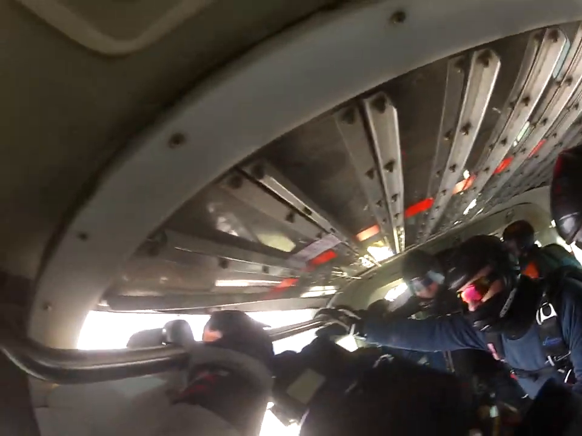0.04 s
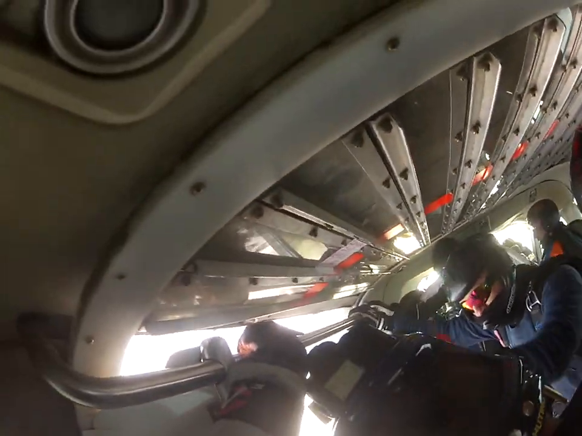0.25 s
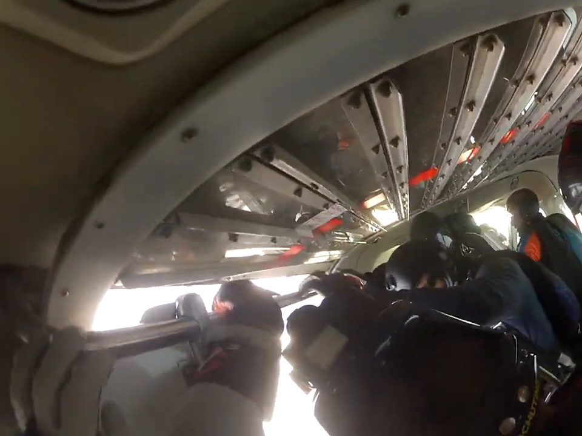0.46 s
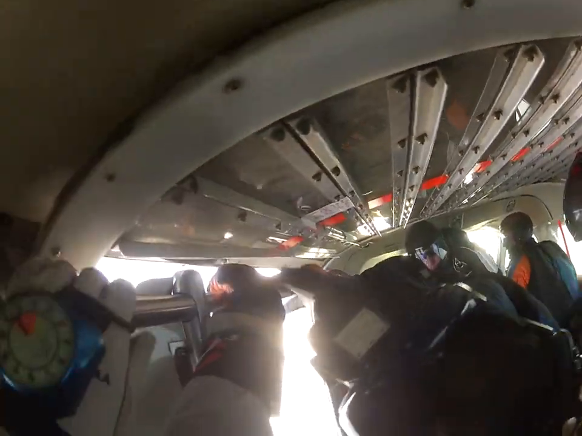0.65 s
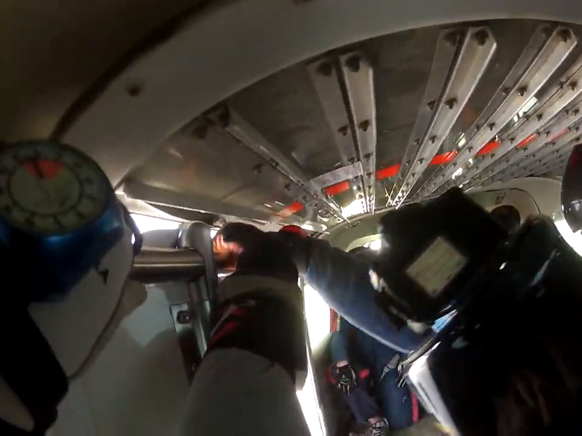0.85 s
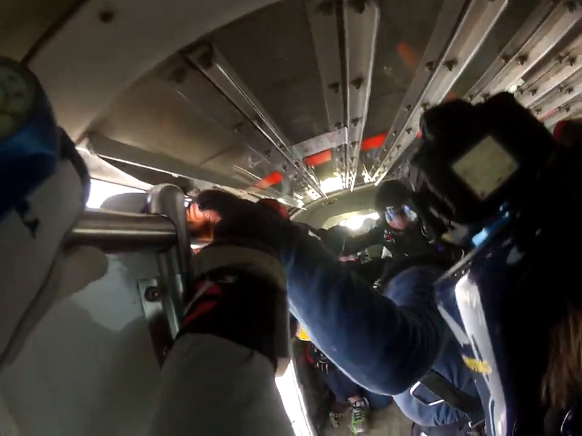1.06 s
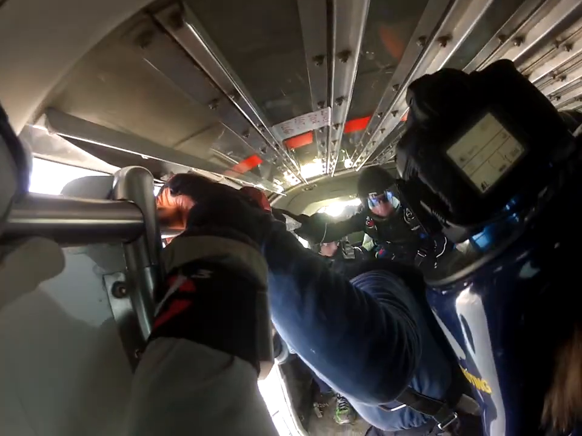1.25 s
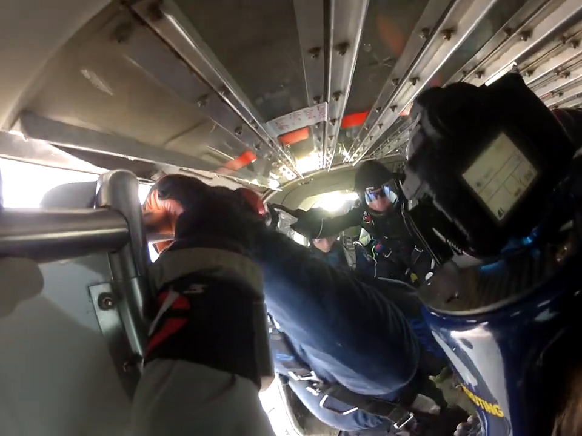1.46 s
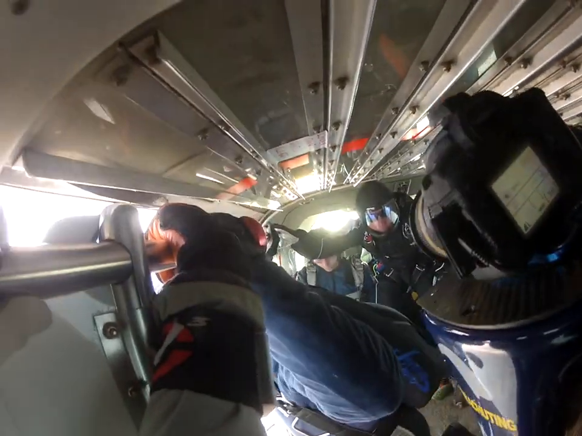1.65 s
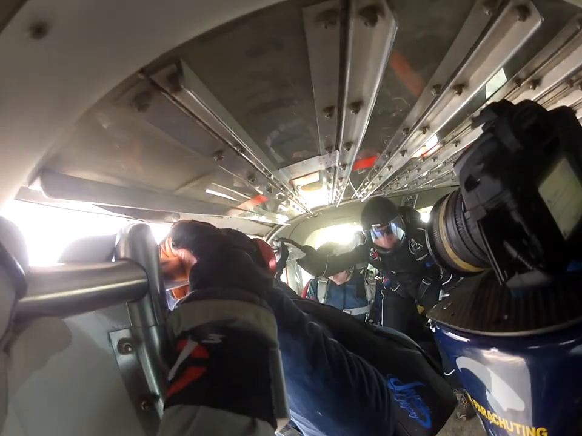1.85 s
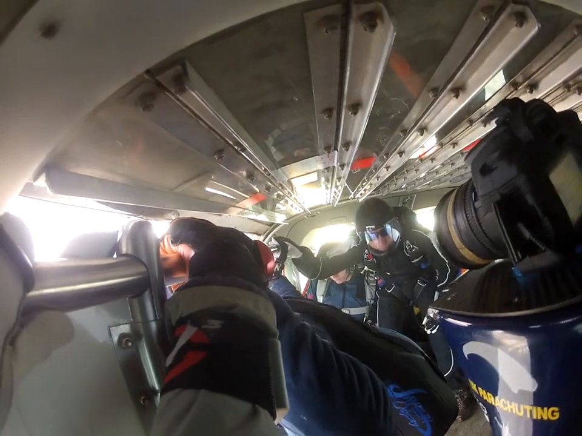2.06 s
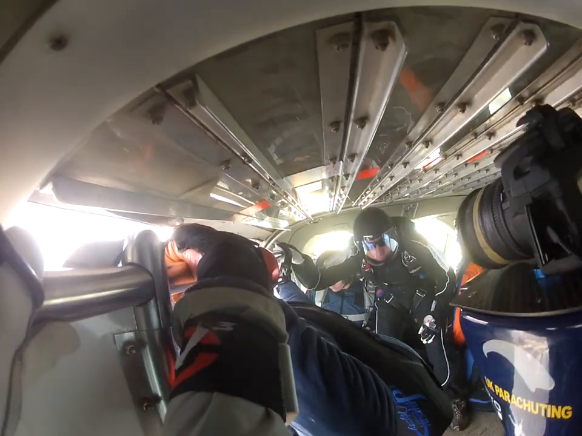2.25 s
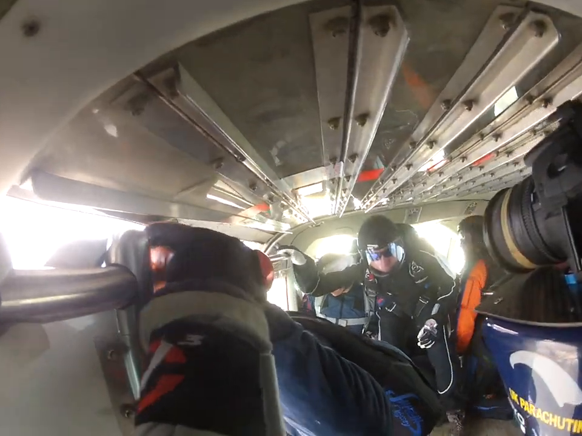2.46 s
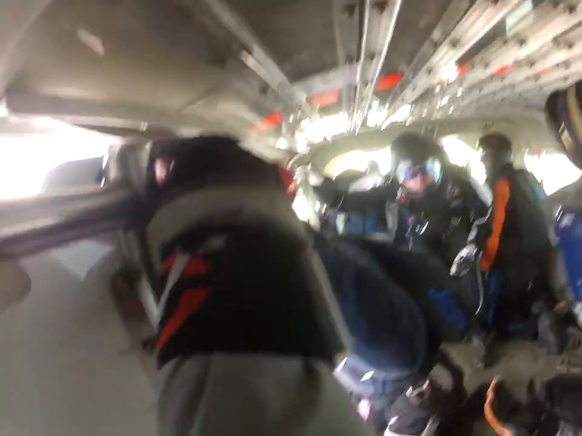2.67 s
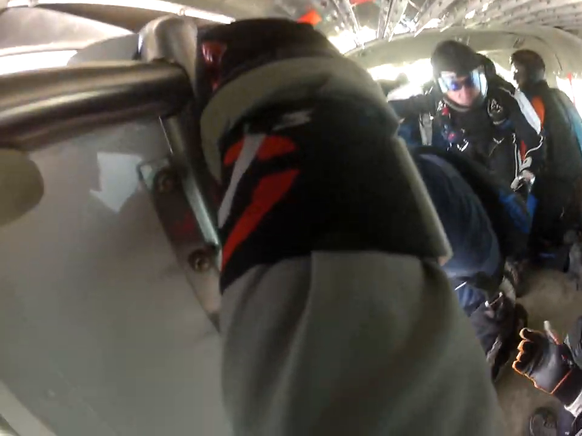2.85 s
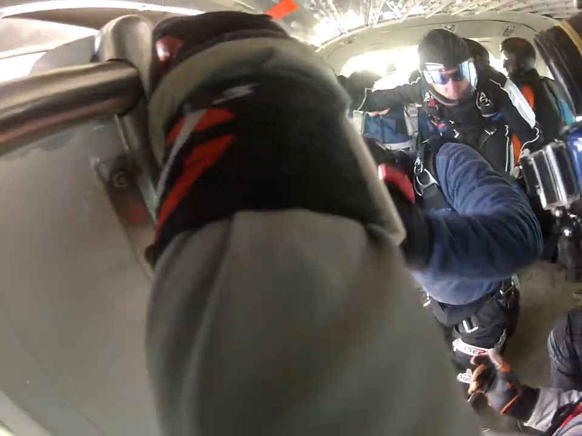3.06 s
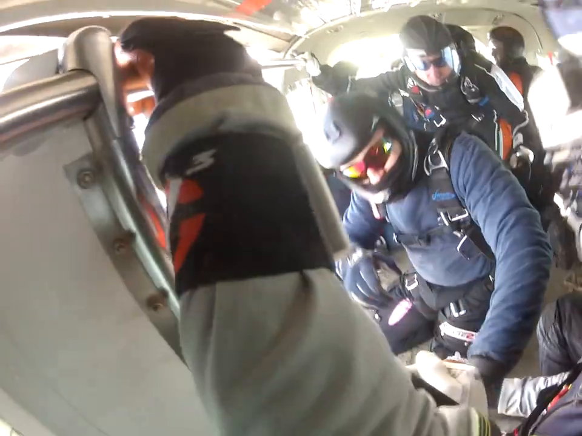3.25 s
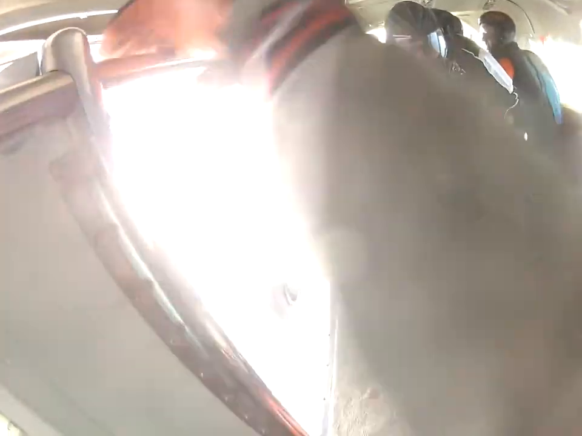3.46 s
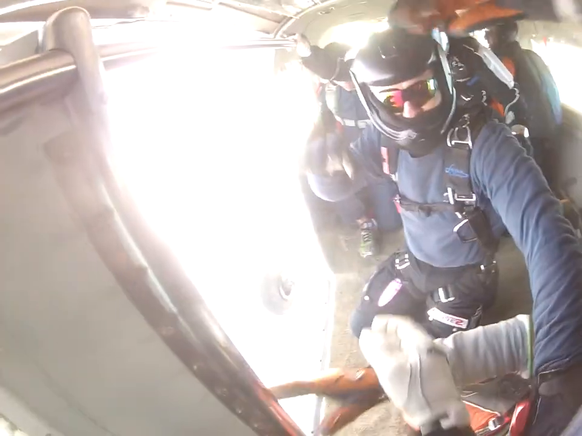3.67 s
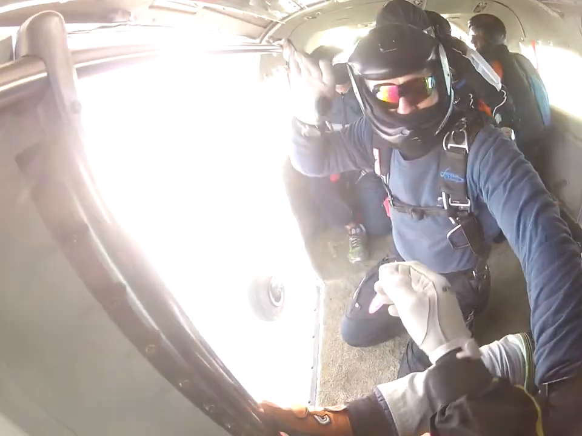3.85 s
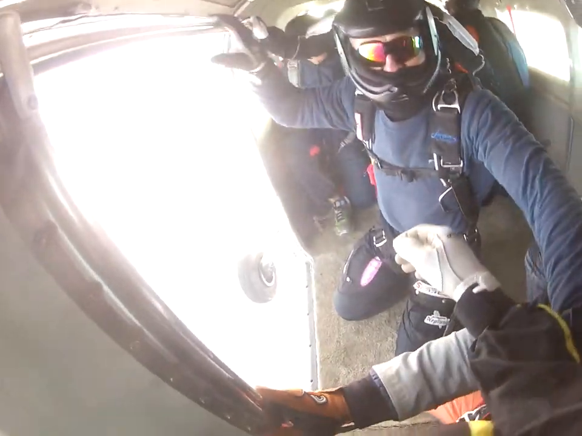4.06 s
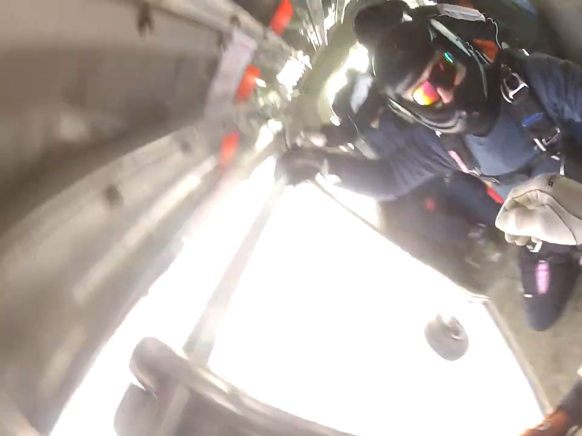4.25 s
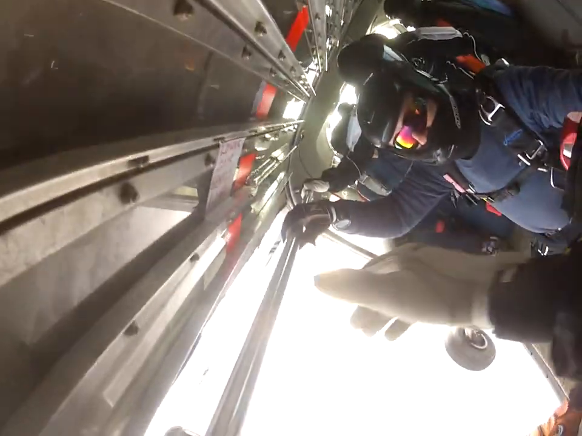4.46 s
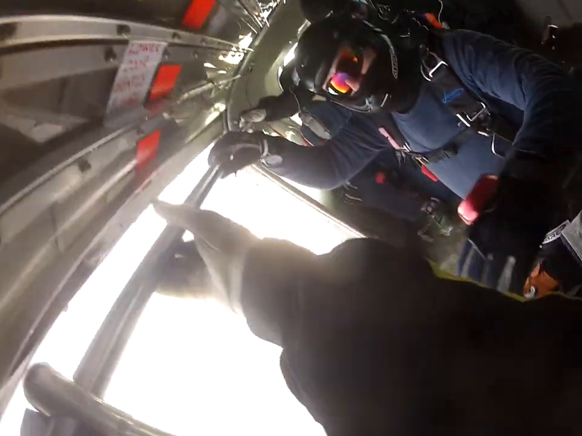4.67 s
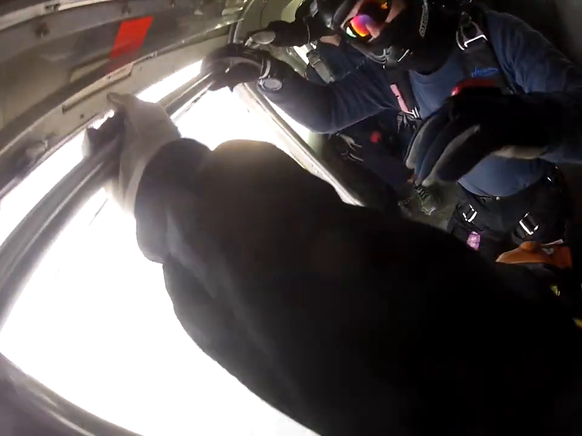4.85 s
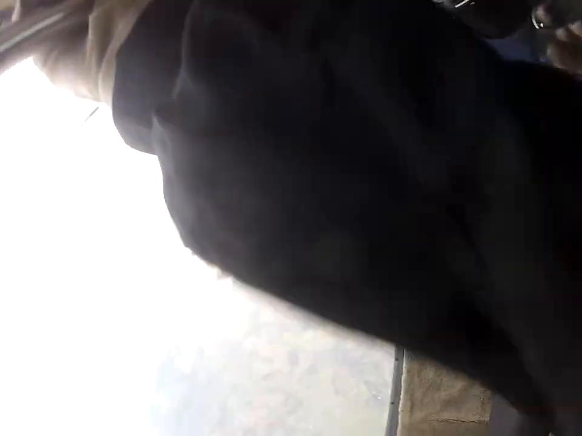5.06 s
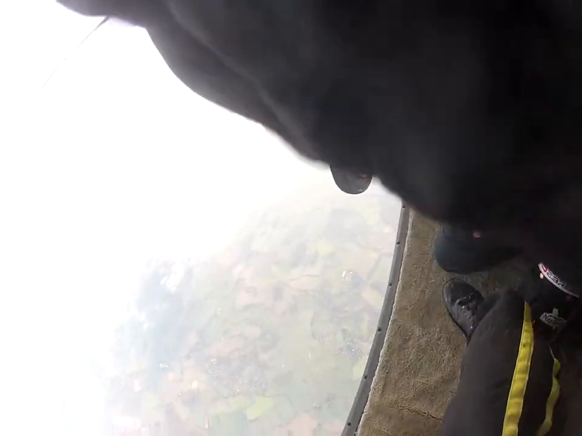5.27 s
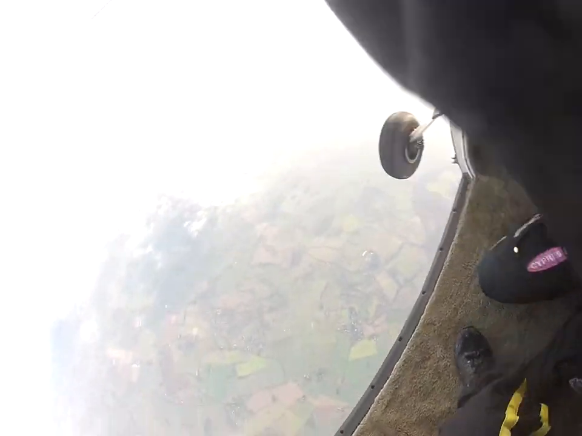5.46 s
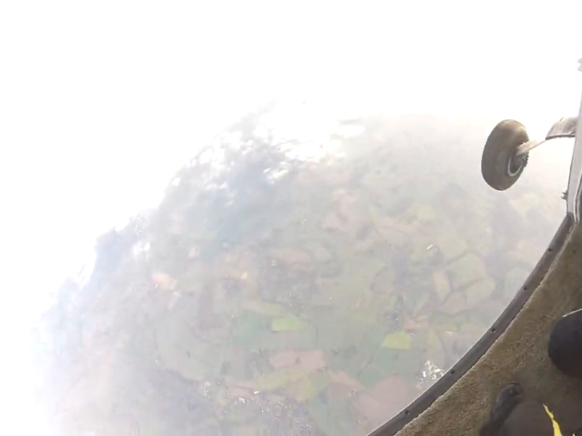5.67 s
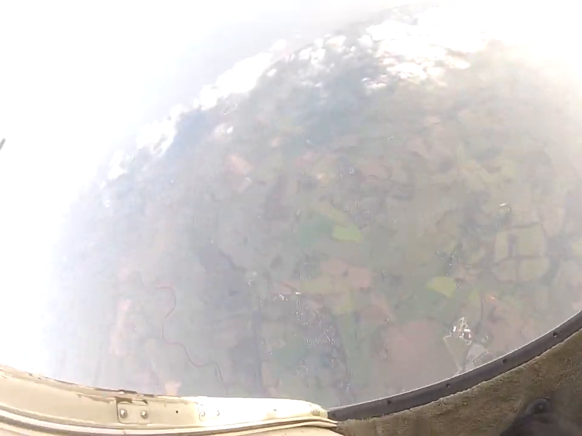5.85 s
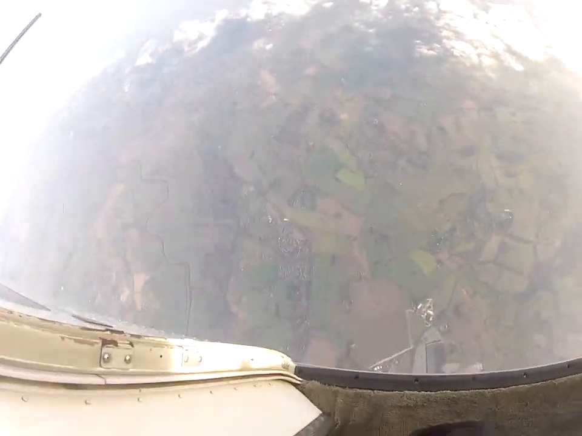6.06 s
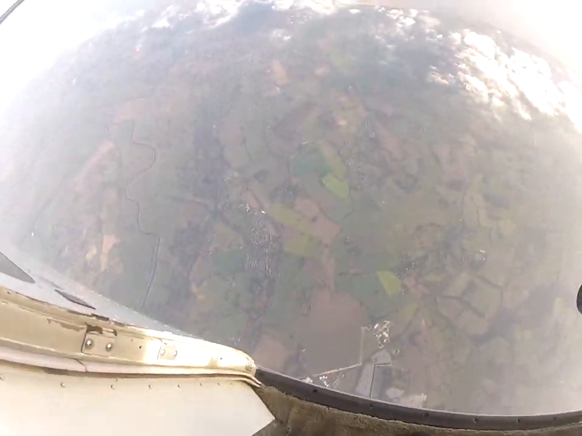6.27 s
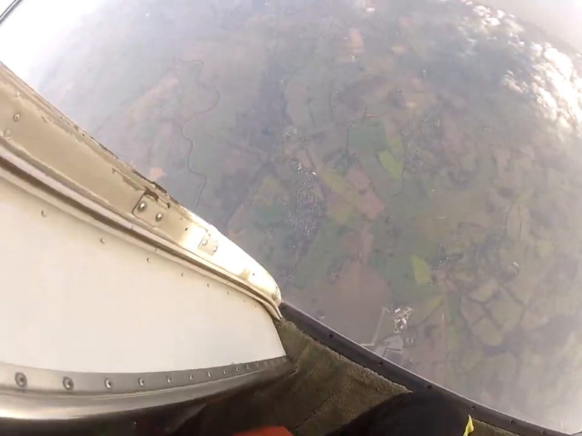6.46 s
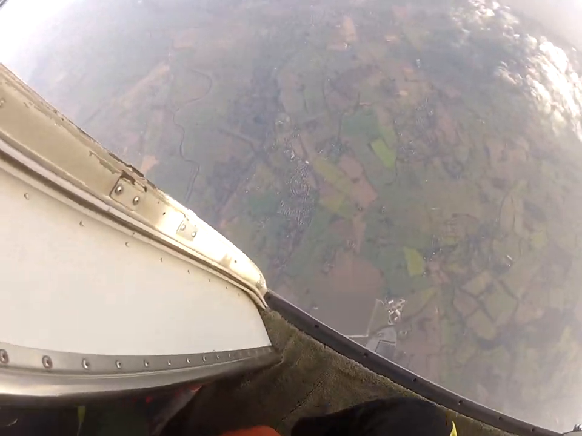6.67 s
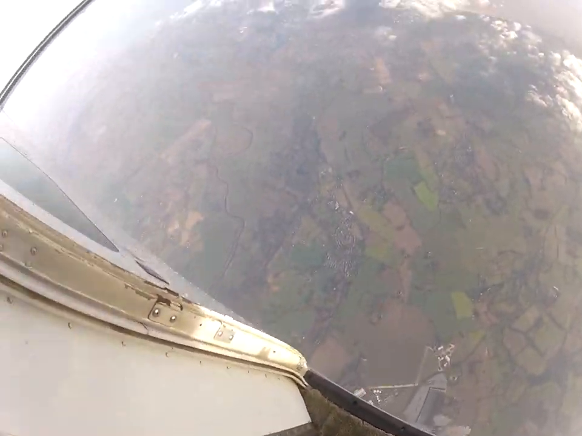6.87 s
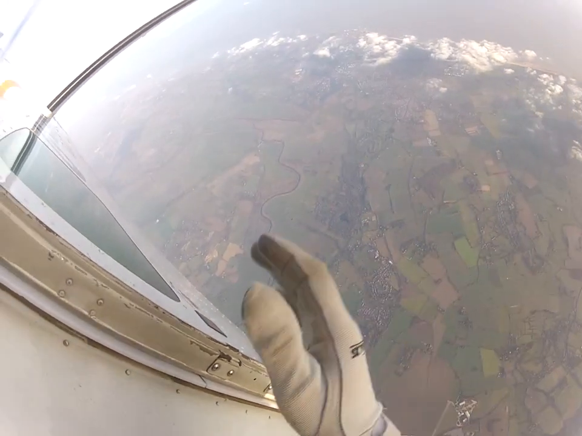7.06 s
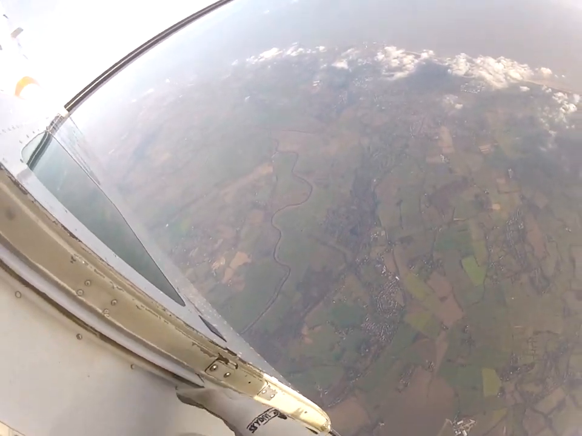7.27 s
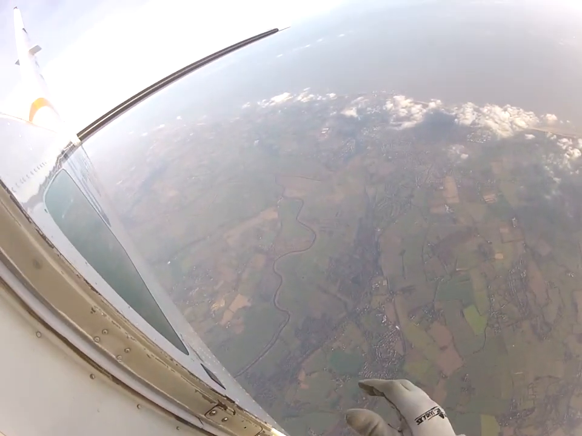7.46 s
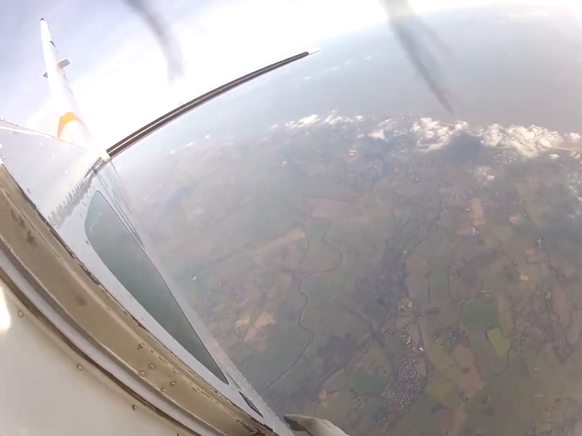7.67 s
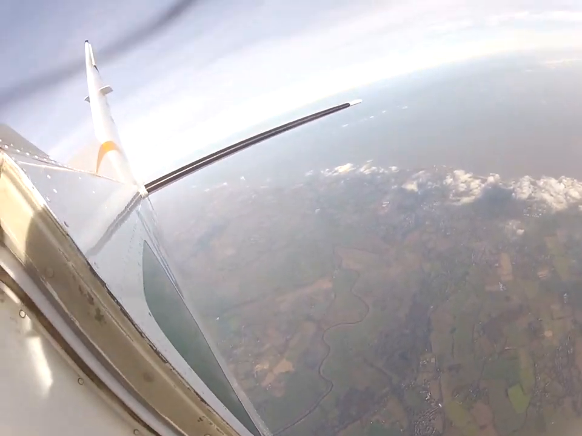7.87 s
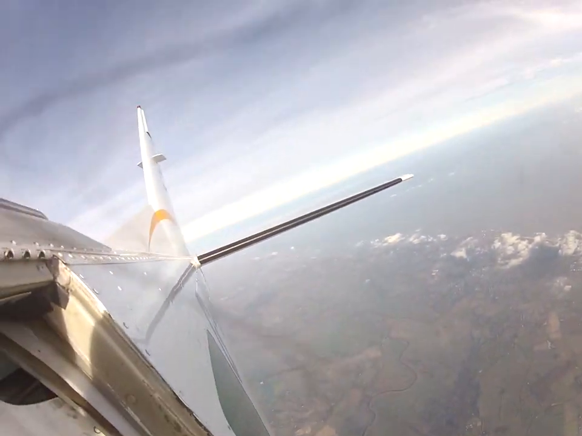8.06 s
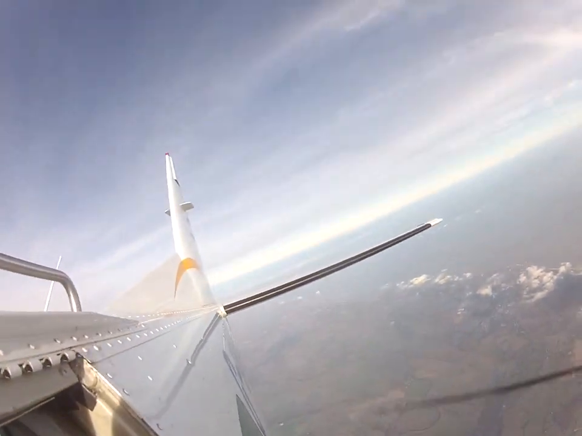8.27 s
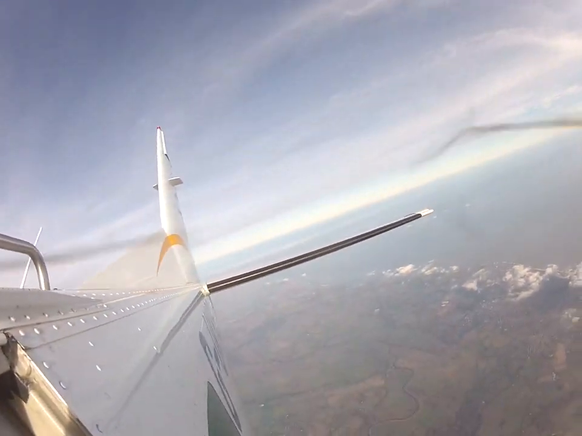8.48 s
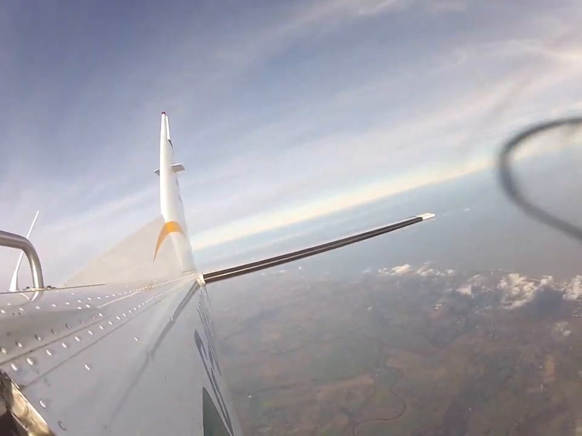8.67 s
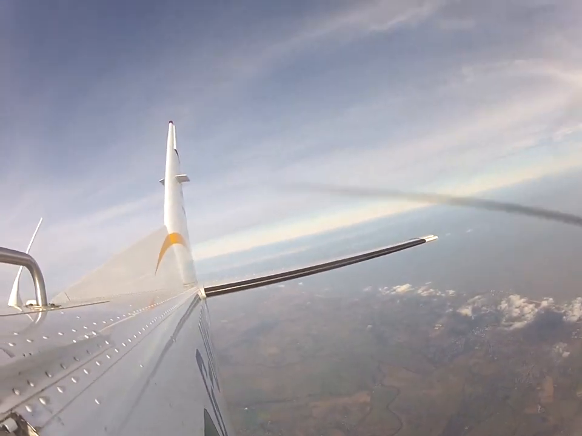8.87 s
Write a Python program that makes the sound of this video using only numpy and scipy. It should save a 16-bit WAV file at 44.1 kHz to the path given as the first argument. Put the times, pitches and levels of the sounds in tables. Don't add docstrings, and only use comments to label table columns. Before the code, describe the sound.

A sheltered, hollow-toned air rush with low rumbling opens at an aircraft doorway. Light puffs and bassy pushes come from about three seconds. After a big low thump just before five, the microphone moves into the slipstream: fluttering slaps, hissing bursts that cut off suddenly, sharp brief lulls and heavy low buffeting, all close, harsh and coarse, with clipped peaks and gritty treble.

```python
import sys
import numpy as np
from scipy import signal
from scipy.fft import rfft, irfft, next_fast_len
from scipy.io import wavfile
from scipy.ndimage import uniform_filter1d

SR = 44100
rng = np.random.default_rng(int(sys.argv[2]) if len(sys.argv) > 2 else 0)


def nominal_scale(level):
    x = np.asarray(level, float) / 20
    return 10 ** x


def wav_record(signal):
    frames = np.transpose(np.atleast_2d(signal))
    bounded = np.clip(frames, -1, 1)
    quanta = np.round(bounded * 32767).astype(np.int16)
    wavfile.write(sys.argv[1], SR, quanta)


N = 393372
HOLD_HZ = 12000
EDGE_SHARPER = 5.5


def evened(x):
    return x / np.sqrt(np.mean(x ** 2) + 1e-20)


def read(points, hz):
    f, value = np.transpose(points)
    return np.interp(np.log(hz + 1), np.log(f + 1), value)


def columns(rows, t):
    s, *rest = np.transpose(rows)
    return [np.interp(t, s, column) for column in rest]


def bumps(rows, t, sharper=1):
    s, half, *lift = np.transpose(rows)
    grid = np.arange(0, N / SR, .001)
    u = (grid[:, None] - s) / half
    steepness = np.where(u * lift[0] > 0, sharper, 1)
    bell = np.exp(-(u * steepness) ** 2)
    return [np.interp(t, grid, bell @ db) for db in lift]


def filtered(x, hz, kind):
    return signal.sosfilt(signal.butter(2, hz, kind, fs=SR, output="sos"), x)


def chance(hz):
    return evened(filtered(rng.standard_normal(N), hz, "low"))


def flutter(low_hz, high_hz):
    return evened(filtered(rng.standard_normal(N), [low_hz, high_hz], "band"))


def steadied(x, share, seconds):
    width = int(seconds * SR)
    power = abs(uniform_filter1d(uniform_filter1d(x ** 2, width), width))
    return evened(x / (power + 1e-9) ** (share / 2))


def noise(colour_db, size, patchy_db):
    frames, hz = 4 * N // size + 5, np.fft.rfftfreq(size, 1 / SR)
    real, imaginary, patches = rng.standard_normal((frames, len(hz), 3)).T
    patches = evened(uniform_filter1d(uniform_filter1d(patches, 6, 0), 10, 1))
    gain = nominal_scale(colour_db(hz[:, None], np.arange(frames)[None] * size / 4 / SR))
    gain = gain / np.sqrt((gain ** 2).mean(0))
    spectra = (real + 1j * imaginary) * gain * nominal_scale(patchy_db * patches)
    return evened(signal.istft(spectra, nperseg=size, noverlap=3 * size // 4)[1][:N])


# time in seconds,
# place from 0 (in the cabin) to 1 (in the slipstream), depth of the hiss flutter in dB.
EXPOSURE = [
    (0, 0.29, 2),
    (2.6, 0.23, 0.76),
    (2.9, 0, 2.5),
    (4.4, 0.31, 2),
    (5.0, 0.072, 0.8),
    (5.3, 0.18, 2.5),
    (5.9, 0.68, 2),
    (6.8, 1, 2.5),
    (8, 0.89, 1.5),
    (8.92, 1, 3),
]
# frequency in Hz, strength in dB per Hz.
CABIN_HISS = [(350, -40), (600, -11), (1290, -12.5), (1420, 3), (1730, -8), (1930, 4.5), (2250, -6.5),
              (2450, -4), (2670, -15.5), (3080, -11), (3800, -14), (5410, -18), (5900, -7.5), (7670, -59),
              (13000, -120)]
# frequency in Hz, strength in dB per Hz.
STREAM_HISS = [(350, -30), (600, -9.5), (741, -9), (823, -9), (923, -5.5), (1350, 0.5), (1560, -7),
               (1930, 3), (2720, -9), (3520, -6.5), (3870, -14), (4510, -17), (5010, -11.5), (5520, -15),
               (5900, -10.5), (7670, -67), (13000, -120)]


def hiss_colour(hz, s):
    out = np.clip(columns(EXPOSURE, s)[0], 0, 1)
    warm_db = columns(RUSH, s)[1]
    treble_db = bumps(GUSTS, s, EDGE_SHARPER)[1] - 0.42 * warm_db
    treble_share = 0.9 * np.interp(hz, [1970, 2560, 3200, 3750], [0.17, 1, 0.64, 0.4])
    above = treble_share * (treble_db - treble_db.mean())
    below = np.clip((1800 - hz) / 300, 0, 1) * 0.35 * (warm_db - warm_db.mean())
    return (1 - out) * read(CABIN_HISS, hz) + out * read(STREAM_HISS, hz) + above + below


def shadow(t):
    length_s, lift_db = 0.013, -0.5
    return bumps([(s, length_s, lift_db) for s, db in PUFFS + STREAM_PUFFS], t)[0]


# time in seconds, steady hiss level in dB,
# turn away from the stream in dB (positive is warmer, negative is brighter).
RUSH = [(0, -34.5, 1.5), (2.7, -35.5, 1.5), (2.78, -30.5, 1), (3.0, -31, 4), (3.75, -32, 0),
        (4.84, -31, 0.5), (5.14, -31.5, 2.5), (5.4, -25.5, 2), (5.83, -28, -8), (5.9, -17.5, 4),
        (6.05, -17.5, -1), (6.25, -24, -3), (6.8, -24, 3), (7.1, -23.5, -0.5), (7.7, -23.5, -0.5),
        (8.1, -23, -3.5), (8.45, -20, -6.5), (8.92, -20, -4)]
# time of the sudden edge in seconds, length in seconds, hiss lift in dB, treble lift in dB.
GUSTS = [(5.525, 0.065, 9.5, 20), (5.535, 0.077, -4, -10), (5.70, 0.12, 2.5, -8), (5.815, 0.015, 4, 0),
         (5.97, 0.03, -3, 6), (6.16, 0.22, 0.5, 1), (6.275, 0.013, -4, 1), (6.375, 0.0093, -6, -5),
         (6.445, 0.098, -5.5, -5), (6.512, 0.018, -17, -11), (6.66, 0.031, -1, 5), (6.775, 0.02, -14, -7),
         (7.017, 0.084, 6.5, -11), (7.285, 0.045, 7.5, -9), (7.292, 0.046, -6, -8), (7.49, 0.046, 6, -8),
         (7.54, 0.15, -2.5, -4), (7.74, 0.14, 3, 0), (7.952, 0.043, -5.5, -1), (8.145, 0.052, 4, 3),
         (8.152, 0.065, -7.5, 3), (8.28, 0.032, 3.5, 8), (8.378, 0.045, 3, 4), (8.385, 0.0095, -9, -6),
         (8.41, 0.028, -12, 8), (8.75, 0.27, 0.5, 1.5)]


def rush(t):
    level_db = columns(RUSH, t)[0] + bumps(GUSTS, t, EDGE_SHARPER)[0]
    depth_db = columns(EXPOSURE, t)[1]
    flutter_db = depth_db * (flutter(low_hz=11.4, high_hz=49.4) + 0.62 * flutter(low_hz=55, high_hz=162))
    fizz = filtered(noise(hiss_colour, size=1024, patchy_db=0.0), 3600, "high")
    fizz = nominal_scale(uniform_filter1d(level_db, int(.25 * SR)) - 5) * fizz
    hiss = steadied(noise(hiss_colour, size=512, patchy_db=1.37), share=1.0, seconds=0.05)
    return nominal_scale(level_db - 1.5 + flutter_db + shadow(t)) * hiss + fizz


# time in seconds, peak level in dB.
DOOR_PUFFS = [(2.881, -19), (3.001, -15), (3.1133, -22), (3.1678, -26), (3.2833, -26), (3.375, -19.5),
              (3.4507, -18), (3.516, -21), (3.6018, -22), (3.689, -19), (3.761, -20.5), (3.8073, -16),
              (4.0368, -26), (4.1206, -20), (4.188, -21), (4.235, -18.5), (4.4264, -16), (4.4838, -23),
              (4.762, -23.5), (4.8969, -20), (4.953, -18.5), (5.0785, -18)]
# time in seconds, peak level in dB.
PUFFS = [(5.1897, -9), (5.2273, -9.5), (5.3, -8), (5.354, -8), (5.395, -7), (5.4427, -7.5), (5.4788, -6),
         (5.5235, -4.5), (5.5747, -7.5), (5.6143, -6.5), (5.6905, -10), (5.752, -6.5), (5.788, -9),
         (5.809, -3), (5.873, -4.5), (5.9034, -13), (6.1316, -4), (6.17, -6.5), (6.2136, -10),
         (6.2363, -3.5), (6.2884, -3.5), (6.3093, -6), (6.335, -3.5), (6.3577, -1.5), (6.3906, -4),
         (6.4357, -7.5), (6.4906, -3.5), (6.502, -2), (6.5294, -14), (6.556, -8.5)]
# time in seconds, peak level in dB.
STREAM_PUFFS = [(6.578, -6), (6.6086, 0), (6.7062, -3), (6.758, -6.5), (6.914, -1.5), (7.26, -7),
                (7.35, -10), (7.4085, -8), (7.4636, -8), (7.5195, -5), (7.541, -5.5), (7.592, -2),
                (7.6098, -6), (7.6306, -11), (7.8029, -2.5), (7.914, -6), (7.938, -3.5), (8.006, -3),
                (8.071, -3), (8.097, -8), (8.1447, -4.5), (8.1934, -2), (8.2206, -13), (8.248, -10),
                (8.2737, -7), (8.319, -5.5), (8.3717, -4.5), (8.454, -3.5), (8.81, -4.5), (8.87, -7)]


def puffs(t):
    dull = steadied(noise(hiss_colour, size=512, patchy_db=1.5), share=0.2, seconds=0.0056)
    bright = evened(filtered(dull, [2300, 4200], "band"))
    door_puffs = [(s, db + 2.5) for s, db in DOOR_PUFFS]
    out = np.zeros(N)
    for s, db in door_puffs + PUFFS + STREAM_PUFFS:
        treble_db = 2.5 + 6.7 * db
        start = round(s * SR)
        at = slice(start - 400, start + 2000)
        u = (t[at] - s - .0018) / 0.0089
        shape = np.exp(-(u * np.where(u < 0, 3.8, 1.5)) ** 2)
        out[at] += nominal_scale(db - 11.0) * shape * (dull[at] + 0.13 * nominal_scale(treble_db) * bright[at])
    return out


# frequency in Hz, strength in dB per Hz.
CABIN_ROAR = [(100, 3), (170, -9), (204, -1), (291, -2), (458, -11), (772, -20), (900, -28), (1170, -25),
              (1980, -120)]
# frequency in Hz, strength in dB per Hz.
ROAR = [(100, -13), (170, -10.5), (243, -1), (576, -19), (730, -34), (822, -15.5), (900, -30), (1170, -14),
        (1980, -120)]


def roar_colour(hz, s):
    out = np.clip(columns(EXPOSURE, s)[0], 0, 1)
    cabin = read(CABIN_ROAR, hz) + 2.3 * np.exp(-((hz - 400) / 55) ** 2)
    return (1 - out) * cabin + out * read(ROAR, hz)


def small_eddies(t):
    small_db = bumps(SURGES, t)[1]
    rumble_db, hz = columns(BUFFET, t)
    air_db, turn_db = (uniform_filter1d(c, int(0.21 * SR)) for c in columns(RUSH, t))
    from_rumble_db = rumble_db - 15.5 + 0.26 * (hz - 55)
    both = nominal_scale(from_rumble_db) ** 2 + nominal_scale(air_db - 4.5) ** 2
    throb_db = 10 * np.log10(both) + small_db + 0.74 * turn_db
    gust_db = bumps(GUSTS, t, EDGE_SHARPER)[0]
    roar_db = air_db - 3 + 0.72 * small_db + 0.66 * turn_db + 0.36 * gust_db
    return throb_db, roar_db


# frequency in Hz, strength in dB per Hz.
THROB = [(53, -26), (90, -3), (200, -4), (260, -42), (440, -120)]


def roar(t):
    throb_db, roar_db = small_eddies(t)
    throb = noise(lambda f, s: read(THROB, f) + 0 * s, size=4096, patchy_db=2.0)
    throb = nominal_scale(throb_db + 1.8) * steadied(throb, share=0.75, seconds=0.071)
    body = steadied(noise(roar_colour, size=2048, patchy_db=-1.0), share=0.82, seconds=0.16)
    return throb + nominal_scale(roar_db + 0.7 + 2.04 * chance(hz=26.6)) * body


# time in seconds, peak level in dB, pitch in Hz.
THUMPS = [
    (0.378, -8, 41.5),
    (0.579, -11, 48.6),
    (2.929, -5, 59.2),
    (3.48, -10, 51.1),
    (4.079, -5, 47.4),
    (4.918, 1.5, 42),
    (5.762, -14, 62),
    (8.045, -1, 62.4),
    (8.188, 0, 60),
    (8.291, -10, 60.5),
]


def thumps(t):
    out = np.zeros(N)
    for s, db, hz in THUMPS:
        swell = np.exp(-((t - s - .015) / 0.016) ** 2)
        out += nominal_scale(db - 8.5) * swell * np.sin(2 * np.pi * hz * (t - s))
    return out


# time in seconds, rumble level in dB, eddy pitch in Hz.
BUFFET = [(0, -35.5, 48.6), (1.04, -29, 51.6), (1.9, -30.5, 71), (2.55, -33.5, 65.5), (2.85, -27, 56),
          (3.7, -27.5, 50.7), (4.4, -36.5, 55), (4.84, -32, 56), (5.15, -27.5, 50), (5.42, -14, 64),
          (5.8, -12.5, 61), (5.9, -22, 61), (6.3, -17, 55), (7.13, -15.5, 58.6), (7.55, -11.5, 48),
          (7.9, -9.5, 52.5), (8.3, -13, 48), (8.92, -16.5, 42.4)]
# centre in seconds, half length in seconds,
# lift of the large eddies in dB, lift of the small eddies in dB.
SURGES = [(0.2, 0.11, 5.5, 0.5), (1.71, 0.027, -1.5, -5), (2.95, 0.071, 4.5, -0.5), (3.13, .06, -8, -3.5),
          (3.25, .06, 6.5, -1.5), (3.53, 0.075, 7.5, -4), (4.1, 0.097, 13.5, -2.5), (4.68, 0.098, -2, -4),
          (4.82, 0.035, -1, -1), (4.93, 0.076, 10, -2.5), (5.56, 0.013, -13, -12), (5.78, 0.063, 7, 9.5),
          (6.16, 0.031, -12, 3), (6.31, 0.077, -0.5, 10.5), (6.46, 0.063, 7, 3.5), (6.57, 0.029, 6, 2.5),
          (6.76, 0.24, -2, 3.5), (7.0, 0.036, 1, 1), (7.33, 0.029, -1.5, -15), (7.4, 0.1, -0.5, 6.5),
          (7.5, 0.032, -5, -3), (7.8, .07, 4.5, -1.5), (7.92, 0.032, 3.5, 7.5), (8.05, 0.026, 3.5, 7.5),
          (8.2, 0.059, 1, -0.5), (8.3, 0.034, 4, -1.5), (8.44, 0.078, -6, 0.5), (8.65, 0.057, 7, 5),
          (8.82, 0.071, 1.5, -0.5)]
# frequency in Hz, strength in dB per Hz.
RUMBLE = [(8.8, -28), (15, -15), (32, -5), (49, 1), (97, -13.5), (130, -21), (170, -41), (290, -120)]


def rumble(t):
    level_db, hz = columns(BUFFET, t)
    level_db = level_db + bumps(SURGES, t)[0]
    wide = noise(lambda f, s: read(RUMBLE, f) + 0 * s, size=8192, patchy_db=3.0)
    turn = np.exp(2j * np.pi * np.cumsum(hz) / SR)
    r = np.exp(-np.pi * 22 / SR)
    shed = rng.standard_normal(N) / turn
    for _ in range(2):
        shed = signal.lfilter([1 - r], [1, -r], shed)
    shed = evened((turn * shed).real)
    return nominal_scale(level_db - 0.5) * steadied(shed + 1.68 * wide, share=0.31, seconds=0.089)


def scene():
    t = np.arange(N) / SR
    return (rush(t) + puffs(t) + roar(t) + thumps(t) + rumble(t))[None]


def masked(x, margin_db, from_hz):
    hz, _, z = signal.stft(x, SR, "cosine", 2048, 1024, boundary="even")
    f = hz[:, None]
    power = abs(z) ** 2 * (f > from_hz / 2)
    middle = np.minimum(np.arange(len(hz)) // 8 * 8 + 4, 1024)
    narrow = uniform_filter1d(uniform_filter1d(power, size=8, axis=1), size=3, axis=2)[:, middle]
    flicker = uniform_filter1d(rng.standard_normal(power.shape), size=3, axis=2)[:, middle]
    narrow = narrow * nominal_scale(8.8 * flicker)
    wide = abs(uniform_filter1d(uniform_filter1d(power, size=241, axis=1), size=3, axis=2))
    loudness = wide.mean(1, keepdims=True) / wide.mean()
    limit = wide * nominal_scale(2 * margin_db + 6 * (f / HOLD_HZ - 1)) / (loudness + .001) ** .1
    keep = (narrow > limit) | (f < from_hz)
    return signal.istft(z * keep, SR, "cosine", 2048, 1024)[1][:, :N]


def band_limit(x):
    return signal.sosfilt(signal.butter(12, 16220, fs=SR, output="sos"), x)


def record(dry):
    size, clip = next_fast_len(N), .69
    hz = np.fft.rfftfreq(size, 1 / SR)
    bass = hz ** 2 / (hz ** 2 + 17 ** 2)
    lowpass_db = -16 * np.clip((hz - 5450) / 280, 0, 1) - 80 * (hz > HOLD_HZ / 2)
    band = irfft(rfft(dry, size) * bass * nominal_scale(lowpass_db), size)
    clipped = np.clip(band, -clip, clip)
    images = clipped * (1 + 2 * np.cos(2 * np.pi * HOLD_HZ * np.arange(size) / SR))
    top_db = np.interp(hz, [11400, 11600, 12400, 12600, 14500, 15100, 15330, 15800, 15900],
                       [0, 2, 2, 0, 1, 0, -10, -17, -70])
    held = irfft(rfft(images) * np.sinc(hz / HOLD_HZ) * nominal_scale(top_db), size)
    mix = masked(held[:, :N], margin_db=-9.0, from_hz=5300)
    return band_limit(mix)


dry = scene()
out = record(dry)
wav_record(out)
```